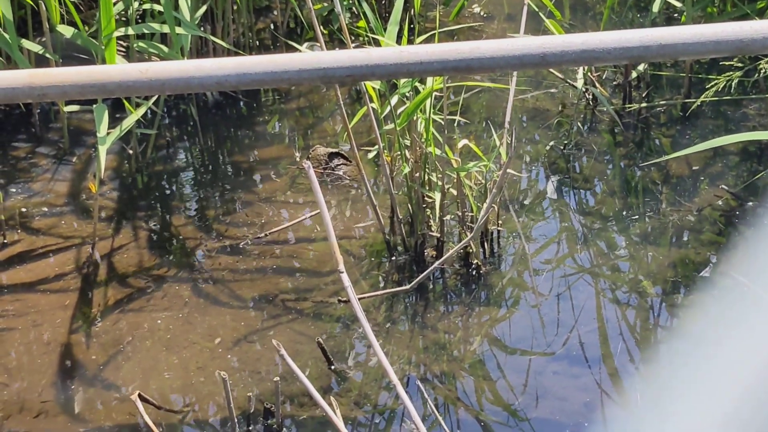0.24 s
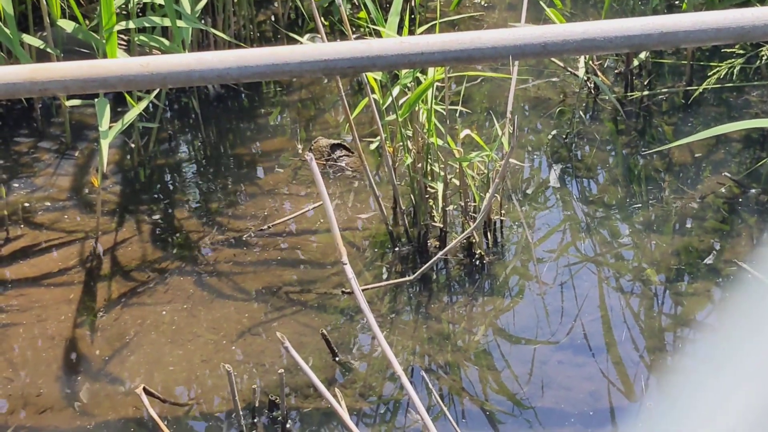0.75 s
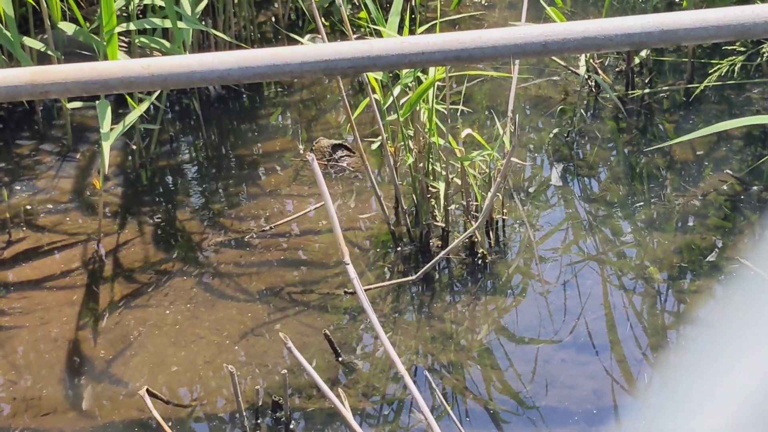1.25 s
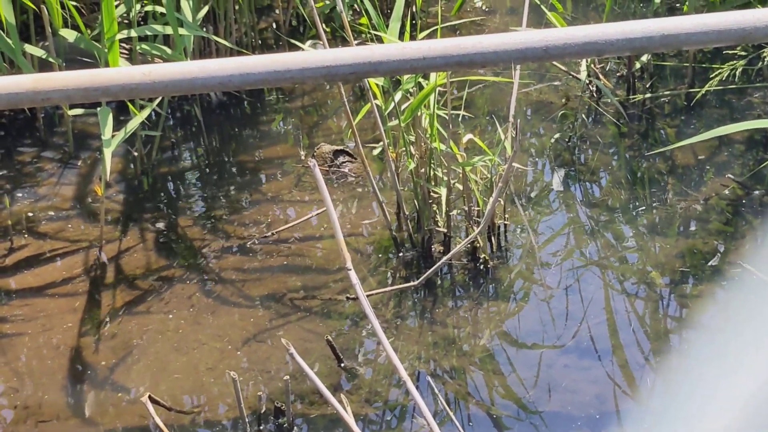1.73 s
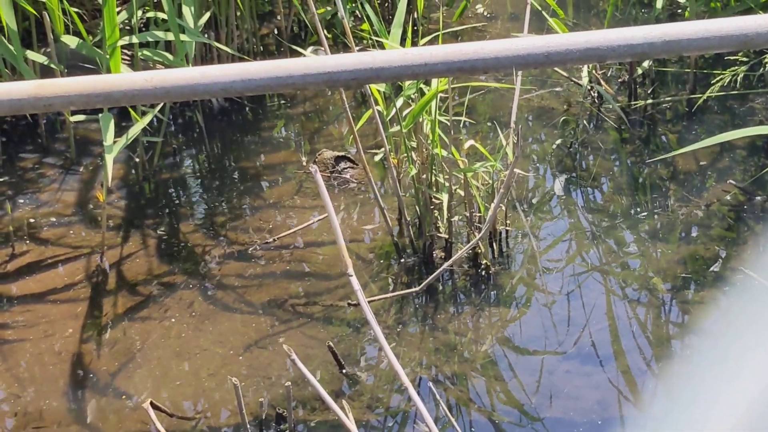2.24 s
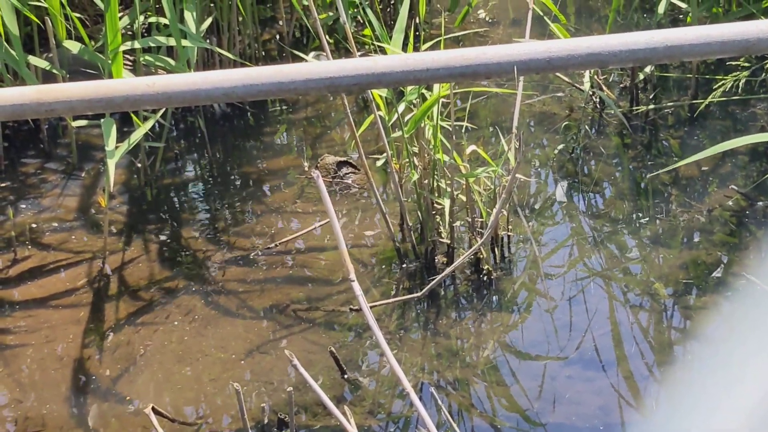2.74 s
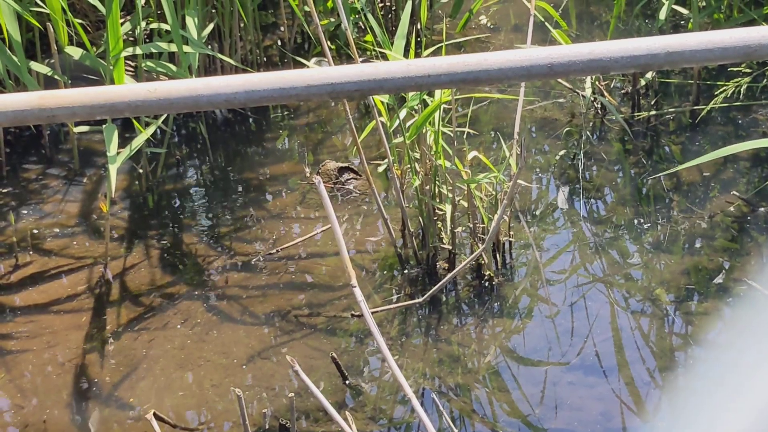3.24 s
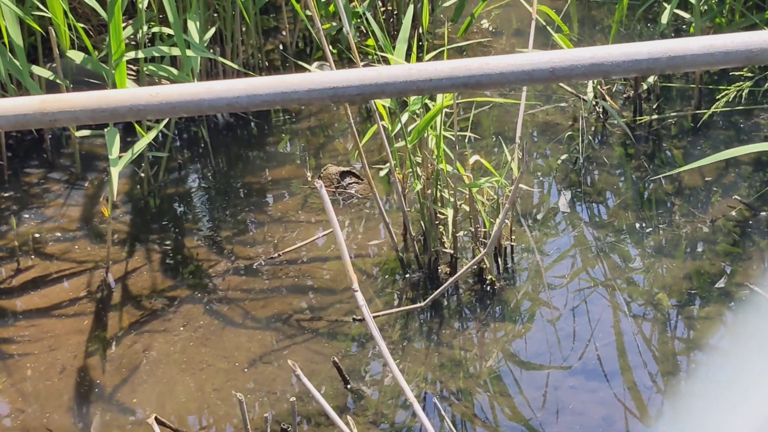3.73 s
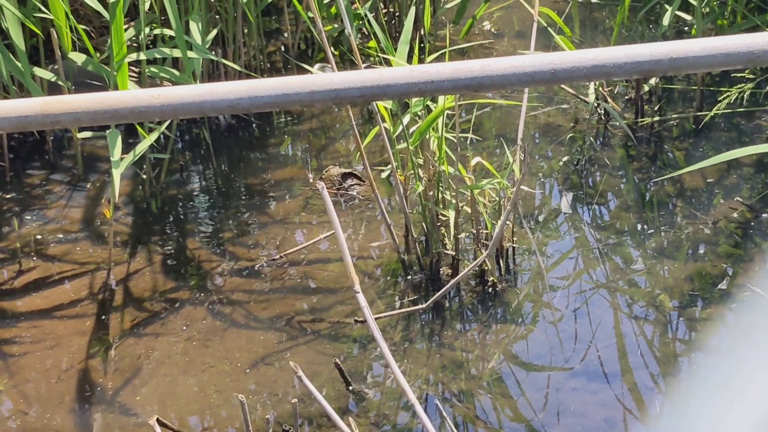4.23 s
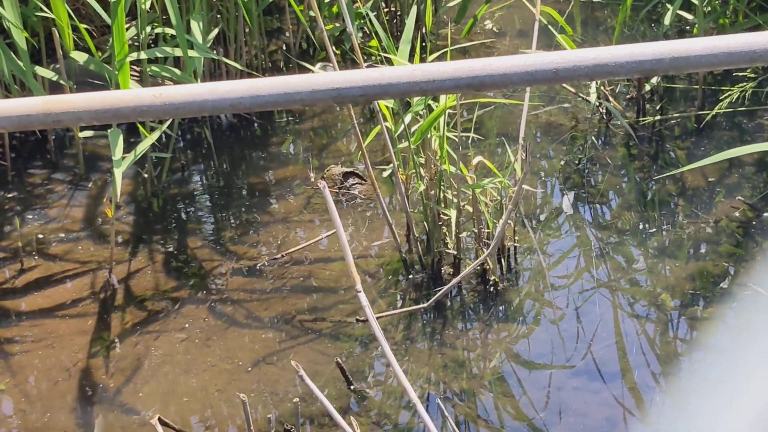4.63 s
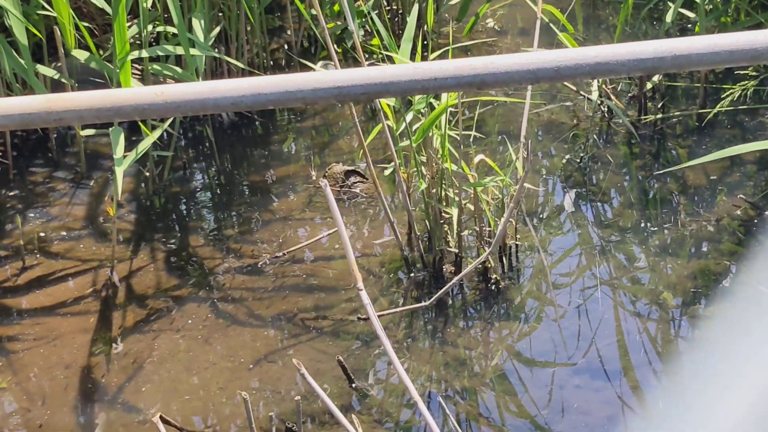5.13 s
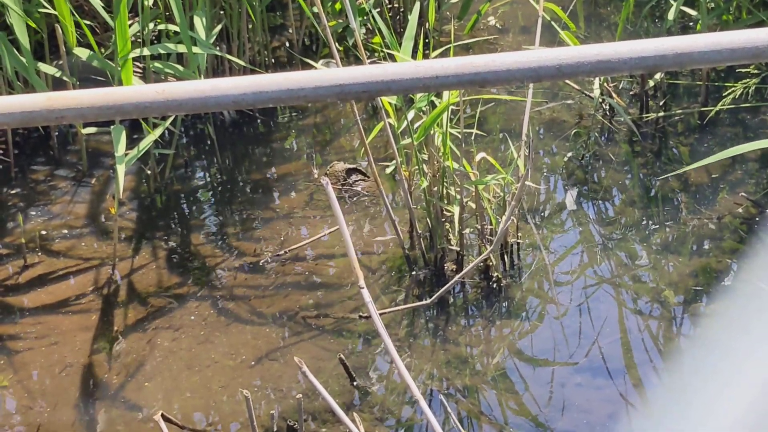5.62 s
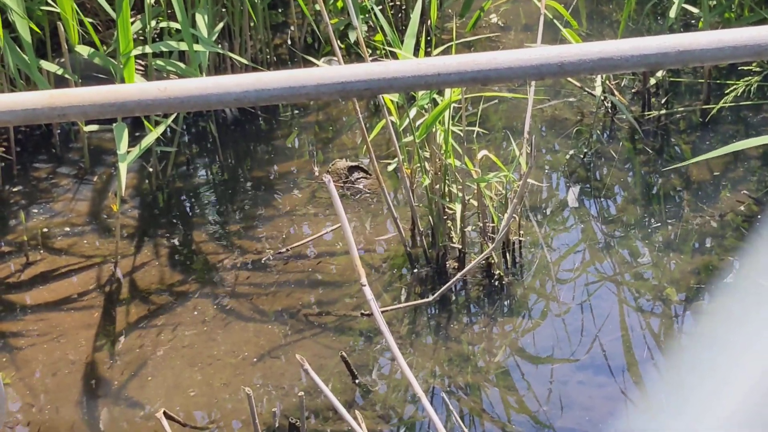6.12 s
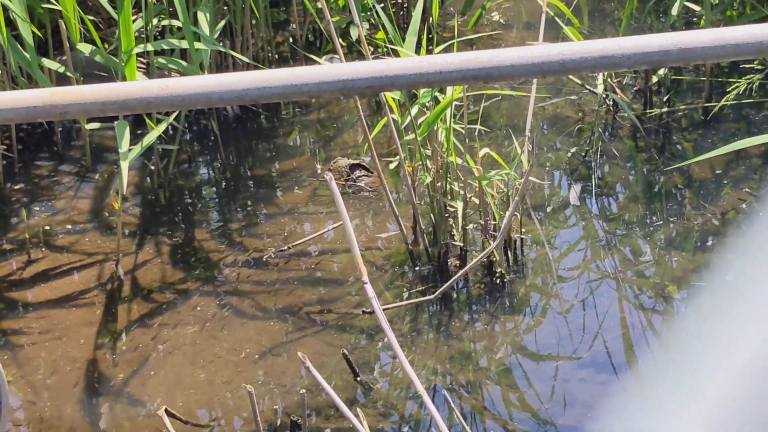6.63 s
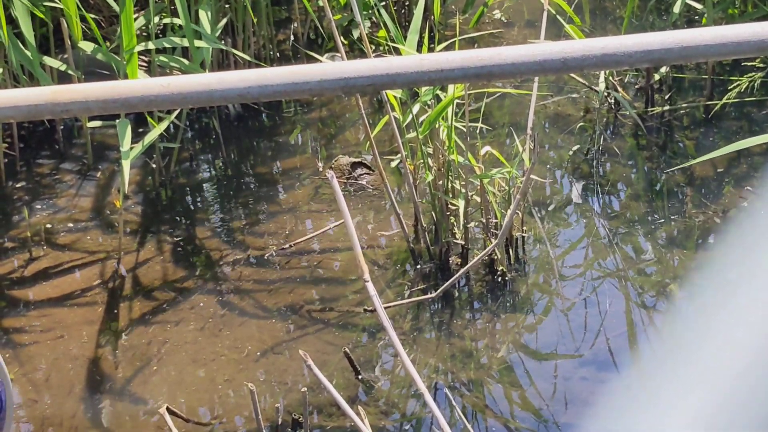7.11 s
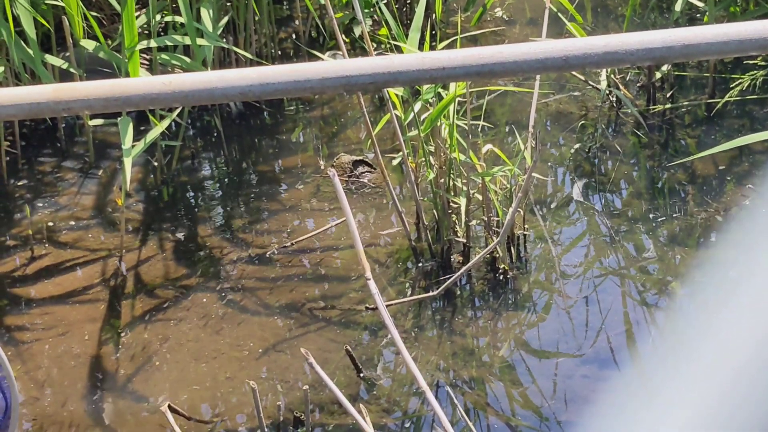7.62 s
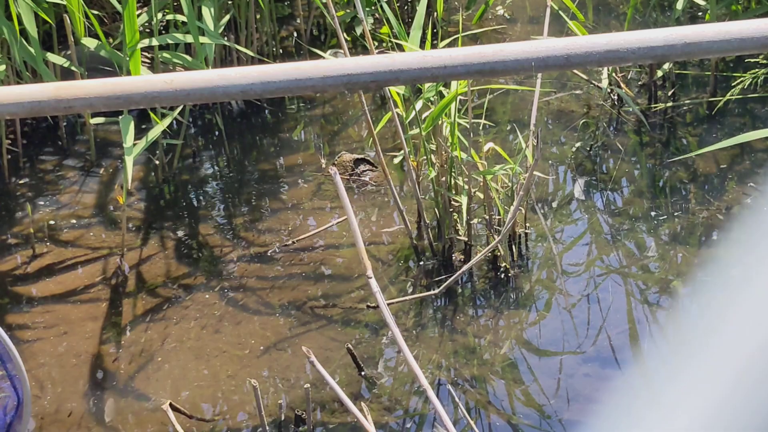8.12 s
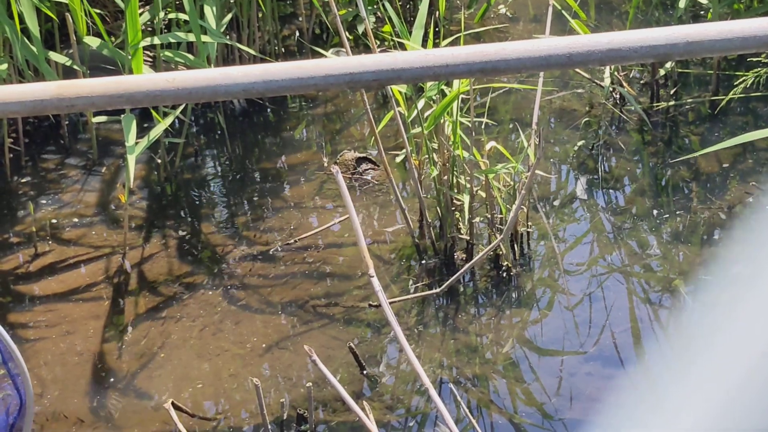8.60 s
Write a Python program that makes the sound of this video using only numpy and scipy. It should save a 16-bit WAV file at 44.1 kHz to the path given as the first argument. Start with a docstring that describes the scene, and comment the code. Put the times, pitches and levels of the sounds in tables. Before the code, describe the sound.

Low pulsing machine drone outdoors, slowly sagging in pitch and surging near the end, with faint repeated high bird chirps and tiny dry ticks.

```python
"""Beside a reedy creek, a microphone pair hears a distant engine throb in soft exhaust pulses over a rumble.
A second machine hums and whines in stacked sines; both sag slowly in speed. Their roar, noise combed by a
ground reflection, swells and fades on the moving air over faint hiss. Soon come dry ticks close by (decaying
bursts) and small birds' bent whistles to the left; later one bird repeats a falling slur and an arched note."""
import sys
import numpy as np
from scipy import signal
from scipy.fft import rfft, irfft
from scipy.io import wavfile
from scipy.ndimage import uniform_filter1d

SR = 44100
rng = np.random.default_rng(int(sys.argv[2]) if len(sys.argv) > 2 else 0)


def transcribe(signal):
    """Save signal, clipped to [-1, 1], as a 16-bit WAV file at the path in sys.argv[1]."""
    frames = np.atleast_2d(signal).T
    limited = np.clip(frames, -1, 1)
    pcm = np.round(limited * 32767).astype(np.int16)
    wavfile.write(sys.argv[1], SR, pcm)


N = 390726
TIME = np.arange(N) / SR  # s
WINDOW, HOP = 2048, 512  # samples
BINS = np.fft.rfftfreq(WINDOW, 1 / SR)  # Hz
FRAMES = np.arange(N // HOP + 3) * HOP / SR  # s


def amp(db):
    """Decibels to gain."""
    return 10 ** (np.asarray(db) / 20)


def unit(x):
    """Scales to rms 1."""
    return x / np.sqrt(np.mean(x ** 2) + 1e-20)


def curve(rows, t=TIME):
    """Every column of a time table at the times t."""
    s, *columns = np.transpose(rows)
    return [np.interp(t, s, column) for column in columns]


def spectrum(points):
    """A frequency table at every bin, interpolated over log frequency."""
    hz, value = np.transpose(points)
    return np.interp(np.log(BINS + 1), np.log(hz + 1), value)


def add(mix, s, sound):
    """Mixes a sound in at time s."""
    part = mix[max(round(s * SR), 0):][:len(sound)]
    part += sound[:len(part)]


def wander(hz):
    """Slow random motion of rms 1, up to about hz."""
    f = np.fft.rfftfreq(N, 1 / SR)
    smooth = np.exp(-(f / hz) ** 2)
    return unit(irfft(rfft(rng.standard_normal(N)) * smooth, N))


def pan(left_db):
    """Gains of the two channels for a left-minus-right level."""
    return np.array([amp(left_db / 2), amp(-left_db / 2)]).reshape(2, 1, -1)


# how alike distant sound is at the two microphones: [f/Hz, likeness 0-1]
MIC_LIKENESS = [(60, 0.99), (130, 0.99), (290, 1), (450, 0.97), (640, 0.95), (1000, 1), (1500, 0.36),
                (2500, 0.66), (4000, .1)]
# its level difference: [f/Hz, left minus right level/dB]
MIC_TILT = [(60, -1.5), (250, -2), (400, 0.5), (560, -1.5), (700, -2), (900, -3), (1400, -4.5), (2000, -2),
            (2400, 4.5), (3000, 4), (5000, 1.5)]
# its phase difference: [f/Hz, lead of the left microphone/rad]
MIC_LEAD = [(0, 2), (100, 0.02), (300, 0.45), (860, 1.08), (1400, 2), (1900, 3.5), (2400, 4.5)]


def noise(field_db, distant=True):
    """Stereo noise of rms 1 shaped over time and frequency; when distant, the left microphone leads in phase."""
    a, b, c, d = rng.standard_normal((4, len(FRAMES), len(BINS)))
    z = np.array([a + 1j * b, c + 1j * d])
    if distant:
        same = np.clip(spectrum(MIC_LIKENESS), 0, 1)
        right = same * z[0] + np.sqrt(1 - same ** 2) * z[1]
        z[1] = right * np.exp(-1j * spectrum(MIC_LEAD))
        z = z * pan(spectrum(MIC_TILT))
    shaped = (z * amp(field_db)).swapaxes(1, 2)
    return unit(signal.istft(shaped, nperseg=WINDOW, noverlap=WINDOW - HOP)[1][:, :N])


# the engine's beat: [t/s, firing rate f/Hz]
ENGINE_BEAT = [(0, 27.5), (3.5, 27.35), (6.2, 27.1), (7, 26.8), (8.86, 26.45)]
# level of the throb before its orders are weighted: [t/s, level/dB]
THROB_LEVEL = [(0, -40.5), (.7, -41.5), (1.5, -36.5), (4.2, -36), (6.9, -35.5), (7.5, -31.5), (8.2, -29.5),
               (8.86, -32.5)]
# harmonics of one exhaust pulse: [multiple of the beat, level against the throb/dB]
THROB_ORDERS = [(1, -3), (2, -3.5), (3, -12.5), (4, -25), (5, -23.5)]
# colour of the low rumble, relative: [f/Hz, level per Hz/dB]
RUMBLE_COLOUR = [(10, -29), (22, -2.5), (50, 6), (85, 1), (130, 0), (155, -11.5), (230, -20.5),
                 (600, -63.5)]


def engine():
    """Each firing pushes one soft pulse out of the exhaust; the upper orders waver most."""
    turns = np.cumsum(curve(ENGINE_BEAT)[0]) / SR + 0.0058 * wander(17)
    level_db, = curve(THROB_LEVEL)
    pulses = 0
    for k, db in THROB_ORDERS:
        pulses = pulses - amp(db + .5 * k * wander(3.0)) * np.cos(2 * np.pi * k * turns)
    throb = np.sqrt(2) * amp(level_db) * pulses * pan(-.6)[:, 0]
    # the deep rumble follows the throb, the upper rumble follows the hum
    upper = spectrum([(60, 0), (110, 1)])
    throb_db = curve(THROB_LEVEL, FRAMES)[0][:, None]
    hum_db = curve(HUM_LEVEL, FRAMES)[0][:, None]
    deep_swell_db = 0.17 * (1 - upper) * (throb_db - throb_db.mean())
    upper_swell_db = 0.37 * upper * (hum_db - hum_db.mean())
    rumble = noise(spectrum(RUMBLE_COLOUR) + deep_swell_db + upper_swell_db)
    return throb + amp(-42.5) * rumble


# the humming machine's sagging pitch: [t/s, f/Hz]
HUM_PITCH = [(0, 107.2), (2.6, 105.6), (4.4, 105.3), (6.4, 104.7), (8.86, 103.1)]
# level of its fundamental before a 1 dB trim and a waver: [t/s, level/dB]
HUM_LEVEL = [(0.0, -48), (0.81, -44), (0.88, -51.5), (1.31, -38.5), (1.45, -45.5), (1.72, -36.5),
             (4.26, -41), (6.43, -39.5), (6.85, -50), (6.97, -40.5), (7.2, -46), (7.35, -35.5), (8.45, -32),
             (8.85, -35)]
# its overtones: [multiple of the pitch, level against the body of the roar/dB]
HUM_OVERTONES = [(2, -19.5), (3, -7), (4, -11.5), (6, -22.5), (8, -29)]


def hum():
    """A stack of lines with a strong third; the overtones ride on the same air as the roar."""
    base_db, over_db = curve(HUM_LEVEL)[0], curve(ROAR_BODY)[0]
    turns = np.cumsum(curve(HUM_PITCH)[0]) / SR + .012 * wander(3)
    turns = np.array([turns, turns - .02])  # the right microphone lags
    base = amp(base_db - 1.0 + 1.8 * wander(12)) * np.sin(2 * np.pi * turns)
    over = 0
    for k, db in HUM_OVERTONES:
        line = np.sin(2 * np.pi * (k * turns + rng.random()))
        over = over + amp(over_db + db + 1.43 * wander(3.4)) * line
    return np.sqrt(2) * (base + over)


# colour of the machines' roar, relative: [f/Hz, level per Hz/dB]
ROAR_COLOUR = [(120, -18.5), (175, 2.5), (250, -3), (330, 1), (430, -1.5), (580, -5), (700, -4.5),
               (850, -8), (1000, -7), (1300, -15), (1800, -26), (2600, -30.5), (3400, -43), (5500, -68)]
# the reflection off the ground: [t/s, lowest cancelled f/Hz, strength 0-1]
GROUND_DIP = [(0, 226, 0.9), (1.7, 217.3, 1), (3, 181, 0.43), (4.2, 183.6, 0.59), (6.8, 170, 0.8),
              (7.5, 167.3, 0.73), (8.86, 157.4, .65)]
# the roar swelling on the air, one table a band, low to high; the roar takes only
# their rise and fall, while the hum's overtones and the whine hang on the body's level: [t/s, level/dB]
ROAR_LOW_END = [(0.05, -59.5), (3.32, -45.5), (4.07, -52.5), (4.48, -48.5), (6.12, -48.5), (6.36, -59.5),
                (7.41, -52), (7.6, -42), (8.53, -50.5), (8.8, -45)]
ROAR_BODY = [(0.03, -57), (0.91, -42.5), (1.01, -50.5), (2.02, -39.5), (2.85, -41.5), (3.22, -35),
             (4.1, -48.5), (4.23, -40.5), (5.31, -36.5), (5.63, -48.5), (6.02, -37), (6.42, -50.5),
             (6.64, -42), (7.0, -45), (7.25, -39), (7.38, -46), (7.64, -33.5), (8.28, -34.5), (8.48, -42),
             (8.85, -36)]
ROAR_MIDRANGE = [(0.03, -57), (0.69, -54.5), (0.81, -44.5), (1.11, -57), (2.14, -48), (2.61, -54),
                 (3.1, -45.5), (3.15, -41), (3.59, -52.5), (3.69, -45), (3.86, -54.5), (5.06, -48.5),
                 (5.09, -44), (5.93, -52.5), (6.12, -45), (6.29, -56.5), (6.66, -50.5), (7.4, -51),
                 (7.79, -31.5), (7.84, -40.5), (8.45, -41.5), (8.58, -37), (8.75, -41), (8.85, -36)]
ROAR_TREBLE = [(0.06, -80.5), (2.01, -73), (2.93, -73), (3.15, -67.5), (3.88, -73), (6.0, -68.5),
               (6.41, -74), (7.19, -69.5), (7.68, -60), (8.8, -61)]
ROAR_DB = -38.5  # before two slow wavers
ROAR_SINK, ROAR_DIP_HZ = 0.48, 170.4  # how far the colour follows the dip; the dip at which it is unshifted


def roar():
    """Machine noise carried by uneven air and combed by its reflection off the ground."""
    tables = (ROAR_LOW_END, ROAR_BODY, ROAR_MIDRANGE, ROAR_TREBLE)
    levels = np.array([curve(table, FRAMES)[0] for table in tables])
    swell = levels - 10 * np.log10(np.mean(amp(levels) ** 2, axis=1, keepdims=True))
    # each band's share of the spectrum, crossfading into its neighbours
    corners_hz = (210, 310, 440, 680, 1200, 2100)
    band_weights = np.eye(4)[:, [0, 1, 1, 2, 2, 3]]
    shares = np.array([spectrum(list(zip(corners_hz, w))) for w in band_weights])
    # the reflection cancels at odd multiples of the lowest dip; rough ground scatters the treble away
    dip_hz, strength = (c[:, None] for c in curve(GROUND_DIP, FRAMES))
    reflected = np.clip(strength, 0, .98) * np.exp(-(BINS / 850) ** 2)
    comb = 1 + reflected * np.exp(1j * np.pi * BINS / dip_hz)
    # the colour of the roar sinks along with the dips
    shift = (dip_hz / ROAR_DIP_HZ) ** ROAR_SINK
    colour_db = np.interp(BINS / shift, BINS, spectrum(ROAR_COLOUR))
    # uneven patches over time and frequency
    patches = uniform_filter1d(rng.standard_normal((len(FRAMES), len(BINS))), size=13, axis=0)
    patches = unit(uniform_filter1d(patches, size=4, axis=1))
    # the machines' casings ring at many fixed, closely spaced pitches
    casing = unit(uniform_filter1d(rng.standard_normal(len(BINS)), size=2))
    field_db = colour_db + swell.T @ shares + 20 * np.log10(abs(comb)) + 2.27 * patches + 1.17 * casing
    return amp(ROAR_DB + 1.12 * wander(32) + .5 * wander(4.6)) * noise(field_db)


WHINE_DB, WHINE_FUZZ = -35, .4  # core level against the roar's body; shake against the core
WHINE_FADES_S, WHINE_FADE_DB_PER_S = 6.4, 4


def whine(order=23, width_hz=7):
    """A fuzzy high overtone that sags with the humming machine and fades late on, and a fainter steady pitch."""
    turn = np.exp(2j * np.pi * order * np.cumsum(curve(HUM_PITCH)[0]) / SR)
    # a steady core, shaken by the air separately at each microphone
    fuzz = np.array([1 + WHINE_FUZZ * (wander(width_hz) + 1j * wander(width_hz)) for side in range(2)])
    upper = amp(-92.5) * wander(12) * np.sin(2 * np.pi * 4178 * TIME) * pan(6)[:, 0]
    fade_db = WHINE_FADE_DB_PER_S * np.maximum(TIME - WHINE_FADES_S, 0)
    level_db = curve(ROAR_BODY)[0] + WHINE_DB - fade_db
    return amp(level_db) * (fuzz * turn).real + upper


# colour of the faint air around the microphones, relative: [f/Hz, level per Hz/dB]
AIR_COLOUR = [(500, -17), (2000, -5), (3300, 4), (4300, 9), (5700, 1), (7000, 4), (8000, -3.5), (11000, 0),
              (15000, -11.5)]
# colour of the right microphone's own hiss, relative: [f/Hz, level per Hz/dB]
MIC_HISS_COLOUR = [(4000, -28.5), (6800, -14.5), (8200, -22.5), (10000, -14.5), (11200, -3), (12100, -1.5),
                   (12500, -6.5), (13400, -6), (15000, -9), (15700, -9)]


def hiss():
    """Faint even air, and the right microphone's own hiss with a thin high tone."""
    air = amp(-80.5) * noise(spectrum(AIR_COLOUR), distant=False)
    own = amp(-71.0) * noise(spectrum(MIC_HISS_COLOUR), distant=False)[1]
    tone = amp(-87.0) * np.sin(2 * np.pi * (13482 * TIME + .12 * wander(8)))
    return air + np.array([np.zeros(N), own + tone])


def banks(x, t60=1.0, wet_db=-8, near_db=-5, echo_db=-9):
    """Quick dense scatter from the reeds, distinct echoes from the banks, then a longer tail from the trees."""
    t = np.arange(SR) / SR
    taps = rng.standard_normal((2, 2, SR)) * (rng.random((2, 2, SR)) < 2000 / SR)
    tail = unit(taps[0] * amp(-60 * t / t60) * (t > .03))
    reeds = unit(taps[1] * amp(-60 * t / .2) * (t > .002))
    response = (amp(wet_db) * tail + amp(near_db) * reeds) / np.sqrt(SR)
    for delay, db in ((.024, 0), (.039, -1), (.062, -3)):  # s, dB
        at = (SR * (delay + rng.uniform(0, 0.0022, 2))).astype(int)
        response[(0, 1), at] += amp(echo_db + db)
    return signal.fftconvolve(x[None], response, axes=1)[:, :N]


# dry ticks close by: [t/s, level before the decay/dB, centre f/Hz, decay time/s]
TICKS = [(.128, -70, 3580, .002), (1.165, -77, 7000, 0.0043), (1.642, -75, 4500, 0.0048),
         (4.802, -67.5, 5230, .008), (6.195, -75, 6900, .005), (7.492, -79, 7496, .004)]


def ticks():
    """Tiny dry snaps, each a quickly dying burst in a broad resonance."""
    out, t = np.zeros(N), np.arange(2048) / SR
    for s, db, hz, decay in TICKS:
        resonance = signal.iirpeak(hz, 4, fs=SR)
        burst = signal.lfilter(*resonance, rng.standard_normal(len(t)))
        add(out, s, amp(db) * unit(burst) * np.exp(-t / decay))
    return out + banks(out, wet_db=-19.5, near_db=-9, echo_db=-30)


def whistle(hz, rasp, share, soft):
    """A note on a pitch curve with soft ends; a share of it buzzes, its pitch jittering by rasp."""
    quiver, buzz = (unit(uniform_filter1d(rng.standard_normal(len(hz)), size=n)) for n in (200, 50))
    hz = hz * (1 + 0.0051 * rng.standard_normal() + .006 * quiver)
    turns = np.cumsum([hz, hz * (1 + rasp * buzz)], axis=1) / SR
    clear, hoarse = np.sin(2 * np.pi * turns)
    share = np.clip(share, 0, 1)
    voice = np.sqrt(1 - share) * clear + np.sqrt(share) * hoarse
    return np.sqrt(2) * voice * signal.windows.tukey(len(hz), soft)


def glide(length, *pitches):
    """A nearly clear call that bends through three pitches."""
    u = np.linspace(0, 1, int(length * SR))
    bend = np.polyfit([0, .5, 1], pitches, 2)
    return whistle(np.polyval(bend, u), rasp=.01, share=0.091, soft=0.33)


# the slur climbs faintly to a crest, then falls evenly in octaves, louder as it drops
SLUR_S, SLUR_CREST_S, SLUR_CREST_HZ = .184, .05, 6330
SLUR_CLIMB_OCT_PER_S, SLUR_FALL_OCT_PER_S = 3.2, 7.4
SLUR_FULL_HZ, SLUR_FADE_DB_PER_OCT, SLUR_RASP = 4140, 30.5, .04  # rasp: share of the pitch


def slur():
    """A thin hoarse crest that falls into a full whistle."""
    t = np.arange(0, SLUR_S, 1 / SR) - SLUR_CREST_S
    octaves = np.minimum(SLUR_CLIMB_OCT_PER_S * t, -SLUR_FALL_OCT_PER_S * t)
    hz = SLUR_CREST_HZ * 2 ** octaves
    strain = np.maximum(np.log2(hz / SLUR_FULL_HZ), 0)
    note = whistle(hz, SLUR_RASP, share=.25 + .7 * strain, soft=0.29)
    return amp(-2.5 - SLUR_FADE_DB_PER_OCT * strain) * note


# the arch rises to a rounded top and hooks down
ARCH_S, ARCH_TOP_S, ARCH_RASP = 0.085, .05, .035
ARCH_START_HZ, ARCH_TOP_HZ, ARCH_END_HZ = 3900, 4620, 3980


def arch():
    """A short note that rises, rounds over and hooks down."""
    t = np.arange(0, ARCH_S, 1 / SR) - ARCH_TOP_S
    before = (ARCH_TOP_HZ - ARCH_START_HZ) * abs(t / ARCH_TOP_S) ** 1.3
    after = (ARCH_TOP_HZ - ARCH_END_HZ) * (t / (ARCH_S - ARCH_TOP_S)) ** 2
    drop = np.where(t < 0, before, after)
    return whistle(ARCH_TOP_HZ - drop, ARCH_RASP, share=0.47, soft=0.35)


# shapes of the other birds' calls, by name: [length/s, start f/Hz, middle f/Hz, end f/Hz]
CALL_SHAPES = {"sigh": (.135, 5900, 5100, 4830), "swoop": (0.12, 6300, 4330, 4700),
               "lift": (.085, 4050, 4170, 4480), "chip": (.052, 3870, 4540, 4130),
               "tsip": (.04, 4800, 3900, 3700), "wip": (.04, 2900, 3250, 3700),
               "peep": (.035, 3300, 3000, 3300)}
# when the others call, before their common trim: [t/s, level/dB, call]
ANSWERS = [(.44, -75, "wip"), (1.075, -76, "tsip"), (1.78, -77, "peep"), (2.516, -69, "tsip"),
           (5.45, -74, "peep"), (5.713, -68, "chip"), (5.785, -75, "peep"), (6.031, -66, "chip"),
           (6.122, -67, "peep"), (6.445, -70, "chip"), (6.625, -69, "tsip"), (6.649, -62.5, "wip"),
           (6.724, -69, "sigh"), (7.182, -64, "chip"), (7.432, -61, "wip"), (7.527, -66.5, "sigh"),
           (7.885, -64, "swoop"), (8.025, -60, "lift")]
# the main singer's phrases, before its trim: [t/s, slur level/dB, arch follows after/s, arch level/dB]
PHRASES = [(2.742, -61, 0.33, -58.5), (3.481, -56, .315, -56.5), (4.212, -54, .319, -55.5),
           (4.96, -54, 0.32, -56), (6.59, -61, .34, -61), (7.342, -55.5, .331, -59.5),
           (8.09, -55.5, .34, -60)]


def birds():
    """Song from the left, scattered by the banks: the main singer is a little hoarse, the others clearer."""
    singer, others = np.zeros((2, N))
    for s, db, call in ANSWERS:
        add(others, s, amp(db) * glide(*CALL_SHAPES[call]))
    for s, slur_db, after, arch_db in PHRASES:
        add(singer, s, amp(slur_db) * slur())
        add(singer, s + after, amp(arch_db) * arch())
    singer = amp(-10.0 + 1.5 * wander(110)) * singer
    others = amp(-11.5 + 1.5 * wander(110)) * others
    direct = (singer + others) * pan(8.4)[:, 0]
    return direct + banks(singer + amp(-1) * others) * pan(8.8)[:, 0]


def scene():
    """All that sounds by the creek."""
    return engine() + hum() + roar() + whine() + hiss() + ticks() + birds()


def record(dry):
    """The recorder's band limit at 15.7 kHz, after a 10 ms soft start."""
    dry = dry * np.minimum(TIME / .01, 1)
    low_pass = signal.firwin(511, 15700, window=("kaiser", 9), fs=SR)
    return signal.oaconvolve(dry, low_pass[None], "same")


dry = scene()
out = record(dry)
transcribe(out)
```